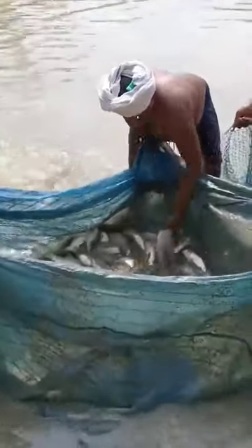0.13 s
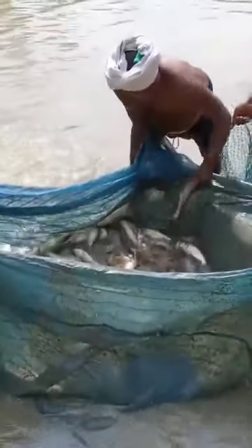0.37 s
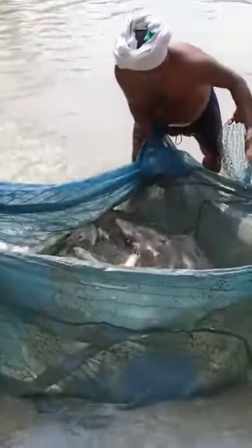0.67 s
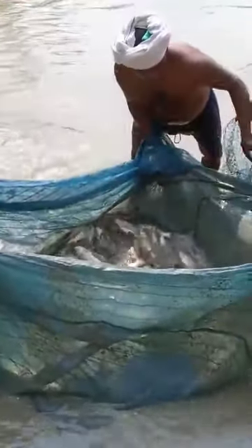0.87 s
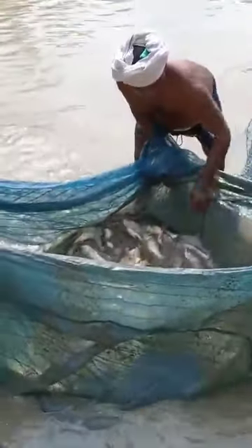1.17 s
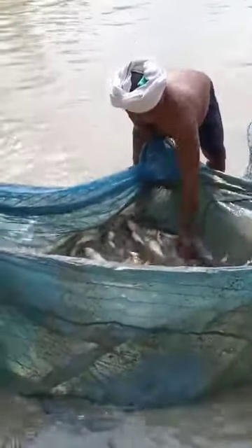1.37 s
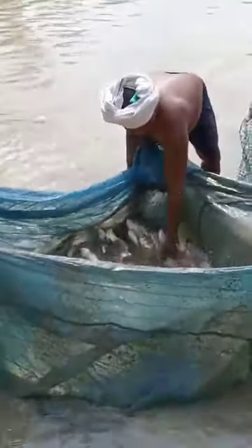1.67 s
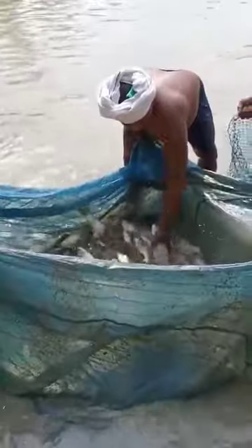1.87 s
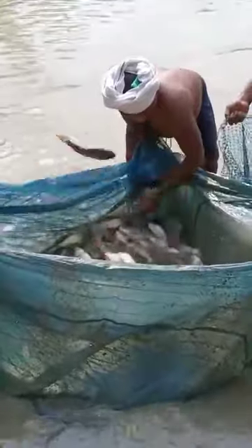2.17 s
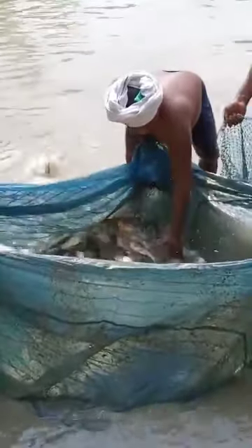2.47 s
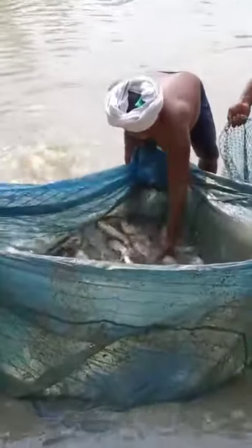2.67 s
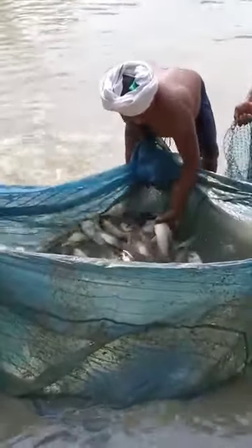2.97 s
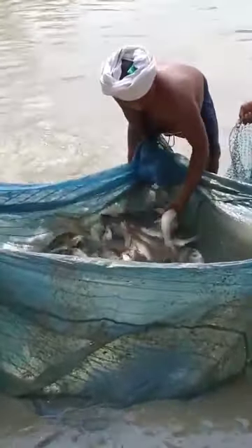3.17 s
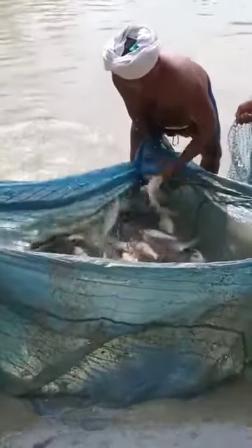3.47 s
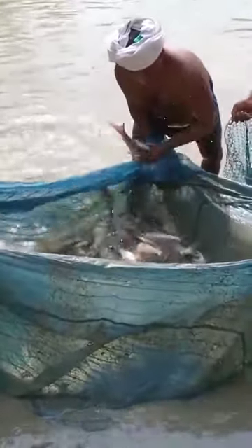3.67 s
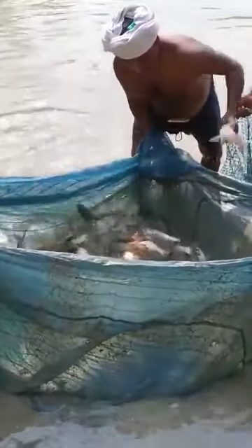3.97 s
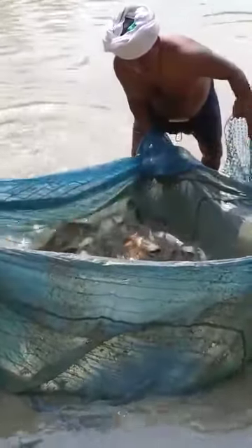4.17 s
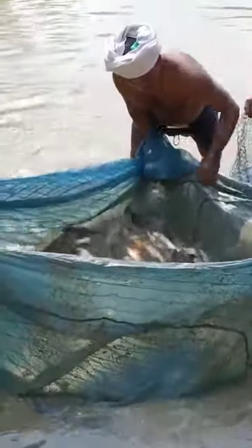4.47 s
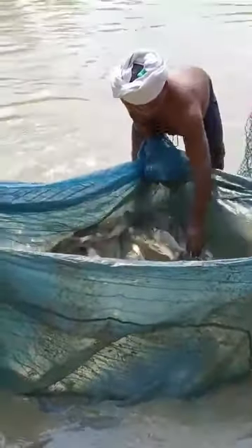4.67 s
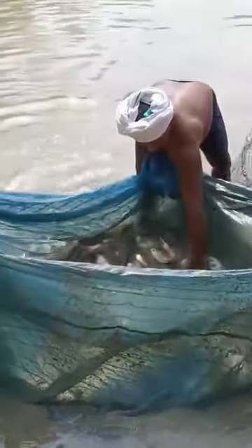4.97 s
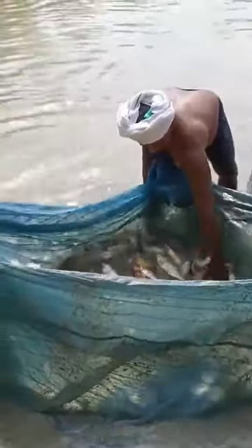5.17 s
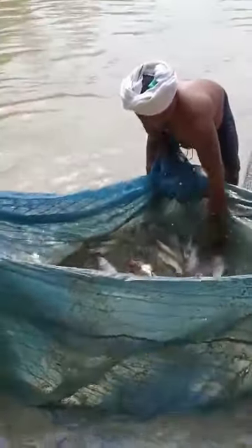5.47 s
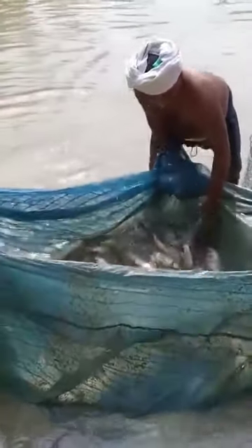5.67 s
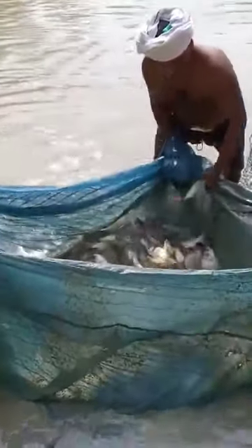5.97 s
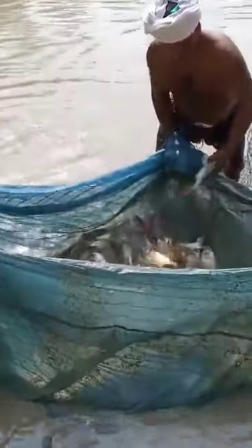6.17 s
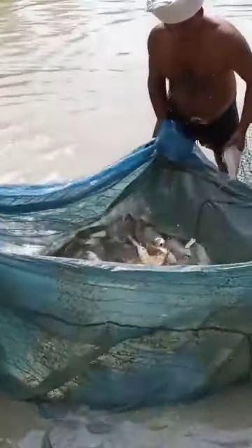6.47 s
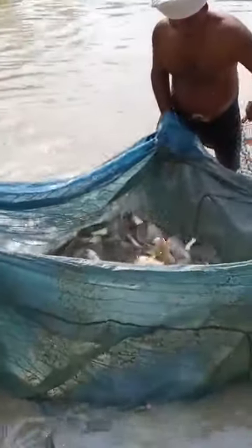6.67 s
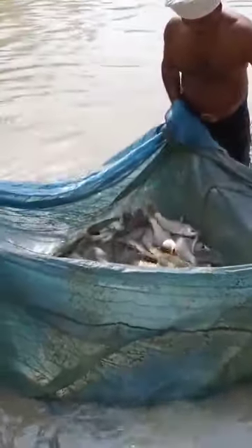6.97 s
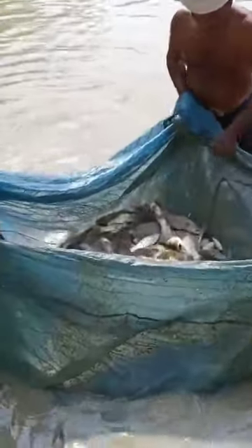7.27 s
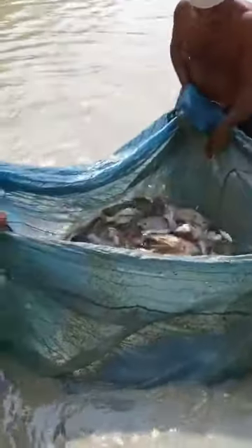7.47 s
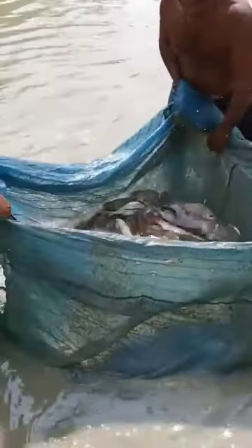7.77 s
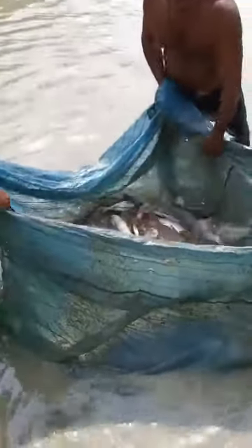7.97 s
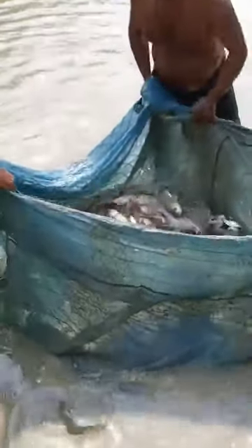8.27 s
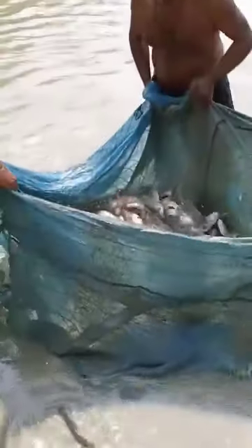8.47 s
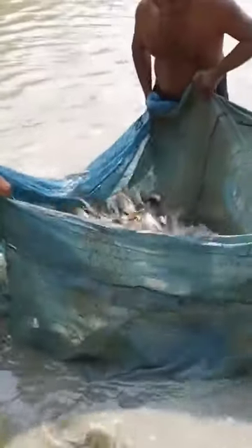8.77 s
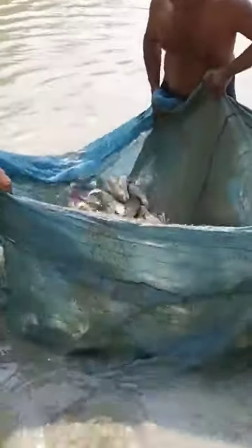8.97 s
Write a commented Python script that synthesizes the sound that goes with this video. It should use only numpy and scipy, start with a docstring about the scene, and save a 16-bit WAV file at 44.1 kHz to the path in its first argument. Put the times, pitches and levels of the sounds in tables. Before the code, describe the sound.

Live fish thrash in a net in river shallows, with wet tail slaps, splashing spray, bubbly plops and a steady watery trickle.

```python
"""Live fish thrash in a net held in the shallows of a river, heard from a few steps away.
From the start, water trickles through the mesh under faint open air, and bouts of spray and slosh come and go.
Large bubbles and ringing tail slaps soon join in, then deep thumps, streams of gurgles, sharp flat cracks
and one rising gulp. The commotion swells at the end as the net is lifted.
Noise makes the spray, slosh and air; fading tones make the bubbles; slaps and thumps use both."""
import sys
import numpy as np
from scipy import signal
from scipy.io import wavfile
from scipy.ndimage import uniform_filter1d

SR = 44100
rng = np.random.default_rng(int(sys.argv[2]) if len(sys.argv) > 2 else 0)


def transcribe(signal):
    """Save signal, clipped to [-1, 1], as a 16-bit WAV file at the path in sys.argv[1]."""
    frames = np.atleast_2d(signal).T
    limited = np.clip(frames, -1, 1)
    pcm = np.round(limited * 32767).astype(np.int16)
    wavfile.write(sys.argv[1], SR, pcm)


N = 402191
TIME = np.arange(N) / SR   # s
SIDES = np.array([[1], [-1]])   # left, right
BALANCE_DB = -0.97   # left minus right, for the noise sounds


def from_db(db):
    """Turn decibels into a factor for the sound pressure."""
    return 10 ** (np.asarray(db) / 20)


def rms(x):
    """Root mean square, a measure of average strength."""
    return np.sqrt(np.mean(np.square(x)))


def rms_one(x):
    """Scale to an rms of 1."""
    return x / rms(x)


def in_time(rows):
    """Draw straight lines between the rows of a table, giving each column at every sample."""
    s, *columns = np.transpose(rows)
    return [np.interp(TIME, s, c) for c in columns]


def at_hz(points, hz):
    """Read a table between its points, with pitch spaced by ratio as the ear hears it."""
    table_hz, values = np.transpose(points)
    return np.interp(np.log(hz), np.log(table_hz), values)


def add(out, s, sound):
    """Mix a short sound in at time s, cutting off whatever runs past the end."""
    at = int(np.clip(round(s * SR), 0, N - 1))
    out[:, at:at + sound.shape[-1]] += sound[..., :N - at]


def drift(per_s):
    """Glide between random values, about per_s of them each second; rms 1."""
    count = int(per_s * N / SR)
    values = rng.standard_normal(count)
    return rms_one(np.interp(TIME, np.linspace(0, N / SR, count), values))


def spread(pair, hz):
    """Turn two unrelated signals into left and right, as alike as the table says for this pitch."""
    # how alike left and right are: f/Hz, likeness (1 = identical, 0 = unrelated)
    likeness = [(200, 0.93), (1000, 0.8), (4000, 0.2), (7000, 0.35)]
    mid, side = pair
    alike = np.clip(at_hz(likeness, hz), 0, 1)
    stereo = np.sqrt(1 + alike) * mid + np.sqrt(1 - alike) * side * SIDES
    return stereo * from_db(SIDES * BALANCE_DB / 2)


def coloured(drive, spectrum, patchy_db):
    """Stereo noise that follows `drive`, built from flickering half-octave bands; keeps the drive's rms."""
    out = 0
    edges = np.geomspace(20, 17000, 21)   # Hz
    white = rng.standard_normal((2, 2, N)) * drive + 1e-18
    for k, (low, high) in enumerate(zip(edges, edges[1:])):
        hz = np.sqrt(low * high)
        flicker_db = patchy_db * drift(per_s=28)
        if spectrum[0][0] / 2 < hz < spectrum[-1][0] * 2:
            band_filter = signal.butter(2, [low, high], "band", fs=SR, output="sos")
            band = signal.sosfilt(band_filter, white[k % 2])   # neighbouring bands use different noise
            out = out + from_db(at_hz(spectrum, hz) + flicker_db) * spread(band, hz)
    return rms_one(out) * rms(drive)


def hiss_around(hz, width_hz, envelope):
    """A stereo burst of noise, filtered twice around one pitch; keeps the envelope's rms."""
    b, a = signal.iirpeak(hz, hz / width_hz, fs=SR)
    noise = rng.standard_normal((2, len(envelope)))
    for _ in range(2):
        noise = signal.lfilter(b, a, noise)
    return spread(rms_one(envelope * noise), hz) * rms(envelope)


def spatter(per_s, t60, size_db):
    """Envelope of random little impacts, each rising at once and falling 60 dB in t60 seconds; rms 1."""
    born = rng.random(N) < per_s / SR
    sizes_db = size_db * np.minimum(rng.exponential(1, N), 3.5)
    power = born * from_db(sizes_db) ** 2
    kept = from_db(-60 / (t60 * SR)) ** 2   # share of the power left after one sample
    return rms_one(np.sqrt(signal.lfilter([1], [1, -kept], power + 1e-18)))


def bubble(hz, cycles, rise):
    """A bubble rings for some cycles while fading 60 dB, its pitch climbing if rise is above 0."""
    age = np.arange(int(cycles / hz * SR) + 2) * hz / (cycles * SR)   # 0 to about 1 over its life
    swell = 1 - np.exp(-2 * age * cycles)
    fade = np.exp(-np.log(1000) * age)
    return swell * fade * np.sin(2 * np.pi * cycles * (age + rise * age ** 2 / 2))


def bubbles(count, low_hz, high_hz, cycles, rise, size_db, width):
    """A cloud of bubbles of all sizes, scattered in time and across the net; rms 1."""
    out = np.zeros((2, N))
    for when, pitch, size, life, place in rng.random((count, 5)):
        hz = low_hz * (high_hz / low_hz) ** pitch
        gain = from_db(size_db * min(-np.log(size), 3)) * np.sqrt(hz)   # small bubbles are brief but sharp
        pan = 1 + width * (2 * place - 1) * SIDES
        add(out, when * N / SR, gain * pan * bubble(hz, cycles * (.5 + life), rise))
    return rms_one(out)


def commotion():
    """Bouts build up and settle at a steady rate in dB over the trickle; gives spray and slosh in dB."""
    # trickle of water through the wet mesh, before the spray's trim: t/s, level/dB
    wet_mesh = [(0, -45), (1.9, -52.5), (4.95, -53.5), (5.65, -49), (5.8, -58.5), (5.92, -47), (9.12, -51)]
    # bouts of thrashing, levels at the crest before spray's trim:
    # crest t/s, build-up/s, settling/s, slosh level/dB, spray level/dB
    bouts = [(0.53, 0.2, 0.14, -44, -41.5), (0.84, 0.035, 0.51, -50, -44.5), (1.265, 0.32, 0.42, -40, -39),
             (1.6, 0.29, 1.0, -51.5, -42), (2.36, 0.58, 0.26, -53.5, -45.5), (2.74, 1, 1, -50.5, -43.5),
             (3.13, 0.055, 1, -48.5, -43.5), (3.42, 0.42, 0.84, -48, -37.5), (3.73, 0.047, 0.19, -44, -41),
             (4.38, 0.74, 0.22, -55.5, -47), (4.64, 0.34, 0.78, -48.5, -46.5),
             (5.095, 0.062, 0.28, -43, -40), (5.38, 1, 0.81, -51, -47), (6.43, 0.36, 1, -49.5, -49),
             (7.35, 0.5, 0.51, -50, -46.5), (7.845, 0.11, 0.18, -39, -40), (8.08, 0.17, 0.34, -48.5, -42.5),
             (8.425, 0.034, 0.028, -37, -62), (8.63, 0.27, 0.21, -40, -41.5), (8.96, 0.87, 1, -40.5, -37)]
    lapping_db = -16   # gentle slosh under the trickle, relative to it
    surge_range_db = 20   # gained over the build-up time, lost over the settling time
    trickle_db, = in_time(wet_mesh)
    sprays, sloshes = [trickle_db], [trickle_db + lapping_db]
    for s, build_s, settle_s, slosh_db, spray_db in bouts:
        below_db = surge_range_db * np.maximum((s - TIME) / build_s, (TIME - s) / settle_s)
        sprays.append(spray_db - below_db)
        sloshes.append(slosh_db - below_db)
    per_db = np.log(10) / 10
    # overlapping bouts add up by power
    return [np.logaddexp.reduce(per_db * np.array(levels)) / per_db for levels in (sprays, sloshes)]


def spray(level_db):
    """Small flaps throw quick showers of droplet noise; ringing drips stop growing in big splashes."""
    # colour of the spray: f/Hz, relative level/dB
    spray_colour = [(300, -16), (1200, -11.5), (2000, -7.5), (2900, -0.5), (4000, -6.5), (4900, -9),
                    (5800, -1.5), (7500, -20.5), (13000, -14), (16000, -24.5)]
    drips_db, drip_limit_db = -8.2, -40.5   # relative to the spray; spray level where drips stop growing
    flap_power = np.square(spatter(per_s=42, t60=.05, size_db=2.2))
    flaps = np.sqrt(uniform_filter1d(flap_power, size=520) + 1.2)   # smoothed over 520 samples
    droplets = np.sqrt(np.square(spatter(per_s=600, t60=.003, size_db=2.0)) + 1.6)
    patter = coloured(rms_one(flaps * droplets), spray_colour, patchy_db=1.8)
    plinks = bubbles(count=1300, low_hz=1500, high_hz=4000, cycles=42, rise=.04, size_db=2.8, width=.8)
    drips = from_db(np.minimum(level_db, drip_limit_db) + drips_db) * flaps * plinks
    return from_db(level_db - 1.0) * patter + drips


def slosh(level_db):
    """Single bubbles pop in a lumpy wash; stirred hard, they give way to the wash and a deeper churn."""
    # colour of the churned water: f/Hz, relative level/dB
    slosh_colour = [(80, -45), (170, 3), (320, -13), (480, 0), (1300, 6), (2000, 3.5), (4000, -11)]
    stirred = from_db(level_db - level_db.max())   # 1 at the strongest moment
    bubbly = .55 * np.exp(-1.4 * stirred)   # share of the power in single bubbles
    wash = coloured(spatter(per_s=300, t60=.05, size_db=1.5), slosh_colour, patchy_db=2.2)
    singles = bubbles(count=1100, low_hz=520, high_hz=2000, cycles=24, rise=.12, size_db=2.6, width=.45)
    churn = bubbles(count=1800, low_hz=149, high_hz=510, cycles=3.4, rise=0.52, size_db=2.0, width=0.15)
    water = np.sqrt(1 - bubbly) * wash + np.sqrt(bubbly) * singles
    return from_db(level_db) * (water + from_db(-14.5) * stirred * churn)


def air(puff_s=0.75, puff_width_s=0.16, puff_db=11.5):
    """Open air rumbles faintly as low noise; one puff of wind swells it briefly."""
    # colour of the open air: f/Hz, relative level/dB
    air_colour = [(25, -9), (50, 8), (110, -6.5), (400, -19.5)]
    calm_db = -67
    puff = np.exp(-((TIME - puff_s) / puff_width_s) ** 2)
    return from_db(calm_db + puff_db * puff) * coloured(np.ones(N), air_colour, patchy_db=1.5)


def plops(scatter=0.085, lag_s=0.022, froth_s=.004):
    """A large bubble rings in a little froth and sheds three weaker ones of nearly the same size."""
    # large bubbles: t/s, strength/dB (before the swell and fade of the ring), starting f/Hz
    large_bubbles = [(0.183, -43, 485), (0.44, -35, 1000), (0.804, -33, 1010), (1.04, -37.5, 925),
                     (1.066, -38, 770), (1.185, -29.5, 1260), (1.272, -30, 930), (1.316, -33, 780),
                     (2.336, -33.5, 1280), (2.544, -39, 670), (2.616, -35.5, 820), (2.803, -43, 696),
                     (3.17, -36.5, 1030), (3.334, -35, 640), (3.421, -31.5, 1000), (3.701, -30, 550),
                     (3.706, -23.5, 1580), (3.787, -37, 680), (4.831, -40, 634), (4.888, -37.5, 560),
                     (5.041, -31.5, 1410), (5.121, -36, 696), (5.902, -38, 1480), (6.303, -33.5, 890),
                     (7.337, -33.5, 1240), (7.782, -30.5, 746), (8.321, -34, 1350), (8.669, -34.5, 485),
                     (8.804, -26.5, 1020), (8.916, -35, 487)]
    out = np.zeros((2, N))
    age = np.arange(SR // 8) / (SR * froth_s)
    froth = age * np.exp(1 - age)   # swells for froth_s, then fades
    for s, peak_db, hz in large_bubbles:
        add(out, s, from_db(peak_db) * bubble(hz, cycles=24, rise=0.11))
        add(out, s, from_db(peak_db - 13) * hiss_around(hz, hz, froth))
        for late, size, place in rng.random((3, 3)):
            pan = 1 + (place - .5) * SIDES
            shed_hz = hz * np.exp(2 * scatter * (2 * size - 1))
            shed = bubble(shed_hz, cycles=13, rise=0.07)
            add(out, s + lag_s * late, from_db(peak_db - 4) * pan * shed)
    return out


def slaps(attack_share=0.01865, ring_cycles=22, tail_db=-23, tail_t60=0.62):
    """A wet tail smacks, sets a pocket of trapped air ringing and is followed by a short shower."""
    # tail slaps, levels before the trims below:
    # t/s, trapped air level/dB, trapped air f/Hz, smack level/dB, time to fall 60 dB/s
    tail_slaps = [(0.3424, -20, 3250, -35, 0.016), (0.526, -48, 1380, -32.5, 0.24),
                  (0.581, -32, 3200, -35.5, 0.082), (0.7554, -21, 3100, -35.5, 0.039),
                  (0.966, -30, 3000, -30.5, 0.12), (1.092, -24.5, 2670, -53, 0.061),
                  (1.328, -33, 2440, -27.5, 0.04), (1.379, -30, 1610, -27.5, 0.091),
                  (1.441, -26, 2380, -35, 0.11), (1.465, -24, 3130, -32, 0.06),
                  (1.528, -22, 3220, -27, 0.057), (2.0395, -23, 2900, -32, 0.051),
                  (2.4756, -20, 2920, -20, 0.019), (2.5083, -26, 1290, -30.5, 0.1),
                  (2.86, -27, 2280, -30.5, .05), (2.8923, -32, 2940, -28, 0.063),
                  (3.2195, -25, 6000, -33, .035), (3.258, -18.5, 2520, -29, 0.058),
                  (3.484, -26, 1540, -32, 0.068), (3.601, -28, 4300, -24, 0.032),
                  (3.643, -27, 2180, -30.5, 0.047), (3.699, -21, 2840, -27, 0.066),
                  (3.77, -26, 2920, -28.5, 0.058), (4.071, -32, 5600, -36, .03),
                  (4.352, -24, 3460, -34.5, 0.075), (4.397, -31, 3180, -37, 0.06),
                  (4.705, -33, 2070, -54, 0.044), (5.381, -21, 3650, -32, 0.017),
                  (5.5685, -29, 5740, -29.5, 0.044), (5.651, -28.5, 3160, -60, .05),
                  (5.97, -31, 3000, -43, 0.13), (6.191, -38, 3240, -32, 0.04),
                  (6.2362, -15, 2580, -33, 0.031), (6.294, -33, 2450, -37, .08),
                  (6.471, -21.5, 2180, -38, 0.066), (6.559, -33, 5600, -34, 0.066),
                  (7.211, -26, 2320, -32.5, 0.078), (7.399, -23, 2880, -30.5, 0.071),
                  (7.624, -31, 3400, -40.5, 0.11), (7.739, -21.5, 1420, -48, 0.045),
                  (7.891, -20.5, 1800, -31, 0.038), (7.937, -22.5, 3900, -29, 0.053),
                  (8.041, -18.5, 2370, -38, 0.029), (8.4203, -17, 3700, -20.5, 0.021),
                  (8.648, -27, 2400, -29, 0.078), (8.746, -21, 1880, -40, 0.074)]
    # colour of the wet smacks: f/Hz, relative level/dB
    smack_colour = [(150, 0), (1500, 10), (3000, 17.5), (5800, 16.5), (7500, 5), (13000, 4.5), (16000, 7.5)]
    t = np.arange(SR // 4) / SR

    def decay(t60):
        """Die away by 60 dB in t60 seconds."""
        return from_db(-60 * t / max(t60, .004))

    drive, pops = np.zeros((2, N)), np.zeros((2, N))
    for s, peak_db, hz, smack_db, t60 in tail_slaps:
        attack_s = attack_share * t60   # a glancing blow both starts and ends more slowly
        blow = (1 - np.exp(-t / attack_s)) * decay(t60)
        shower = from_db(tail_db) * decay(tail_t60)
        add(drive, s, from_db(smack_db) * (blow + shower))
        # air squeezed out from under the tail hisses around its pitch
        add(pops, s, from_db(peak_db - 14.0) * hiss_around(hz, hz * 0.36, blow))
        # the trapped pocket rings as the tail lands
        add(pops, s + attack_s, from_db(peak_db - 3.5) * bubble(hz, ring_cycles, rise=0))
    smacks = coloured(drive, smack_colour, patchy_db=1.5)
    return from_db(-3.43) * smacks + pops


def thumps(cycles=8.7, churn_s=0.00523):
    """A deep stroke opens a cavity that collapses in a few damped swings and leaves the water churning."""
    # deep strokes under water: t/s, strength/dB (before the trims below), starting f/Hz
    deep_strokes = [(1.265, -41, 223), (1.381, -31.5, 390), (1.469, -35.5, 200), (2.03, -48, 185),
                    (2.609, -46.5, 168), (3.201, -43, 118), (3.444, -30.5, 388), (3.484, -39, 206),
                    (3.628, -35.5, 394), (4.655, -40, 236), (5.078, -42, 240), (8.445, -35.5, 340),
                    (8.803, -29.5, 407), (8.884, -35, 168), (9.034, -32, 285)]
    out = np.zeros((2, N))
    age = np.arange(SR // 8) / (SR * churn_s)
    churn = age * np.exp(1 - age)   # strongest after churn_s, so it starts that much early
    for s, peak_db, hz in deep_strokes:
        add(out, s, from_db(peak_db + 4) * bubble(hz, cycles, rise=0.44))
        add(out, s - churn_s, from_db(peak_db - 9) * hiss_around(hz * 1.6, hz * 3, churn))
        # the whole body of water heaves
        add(out, s, from_db(peak_db - 8.0) * bubble(hz=165, cycles=cycles / 2, rise=0))
    return out


def gurgles(fade_s=0.047):
    """Trapped air escapes from under the net in streams of big bubbles, all of much the same size."""
    # streams of escaping air: start t/s, end t/s, full level/dB
    streams = [(3.685, 3.835, -55), (4.78, 5.01, -56.5), (7.74, 7.856, -52), (8.552, 9.147, -49.5)]
    stream = bubbles(count=1400, low_hz=450, high_hz=760, cycles=18, rise=.12, size_db=1.4, width=.6)
    gain = np.zeros(N)
    for start, end, db in streams:
        to_edge_s = np.minimum(TIME - start, end - TIME)
        gain += from_db(db) * np.clip(to_edge_s / fade_s, 0, 1)
    return stream * gain


def cracks(pulse_s=.0005):
    """A body landing flat on the water sends out one sharp pressure pulse and a shallow rebound."""
    # flat blows on the water: t/s, peak level/dB
    flat_blows = [(5.384, -31.5), (6.5607, -37), (7.8935, -33), (8.6492, -27), (9.0372, -15.5)]
    out = np.zeros((2, N))
    age = TIME[TIME < .008] / pulse_s
    for s, peak_db in flat_blows:
        add(out, s, from_db(peak_db) * (1 - age) * np.exp(-age))
    return out


def gulp():
    """A pocket of air shrinks as it closes, so its tone sweeps upward in pitch."""
    # path of the gulp: t/s, f/Hz, peak level/dB
    sweep = [(7.645, 350, -64), (7.685, 450, -51.5), (7.725, 1040, -63)]
    hz, level_db = in_time(sweep)
    sounding = (TIME > sweep[0][0]) & (TIME < sweep[-1][0])
    return sounding * from_db(level_db) * np.sin(2 * np.pi * np.cumsum(hz) / SR)


def scene():
    """The fish and the water over the open air."""
    spray_db, slosh_db = commotion()
    water = spray(spray_db) + slosh(slosh_db)
    fish = plops() + slaps() + thumps() + gurgles() + cracks() + gulp()
    return water + air() + fish


def record(dry):
    """Cut the treble steeply above 15500 Hz."""
    return signal.sosfilt(signal.ellip(10, .1, 80, 15500, fs=SR, output="sos"), dry)


dry = scene()
out = record(dry)
transcribe(out)
```